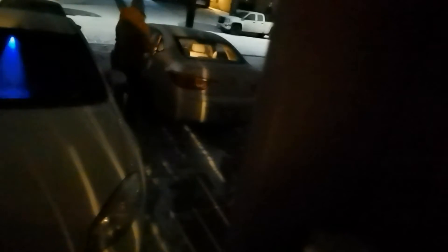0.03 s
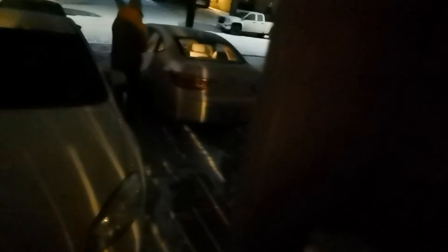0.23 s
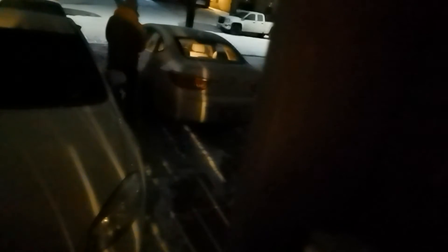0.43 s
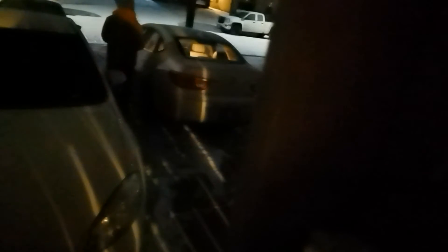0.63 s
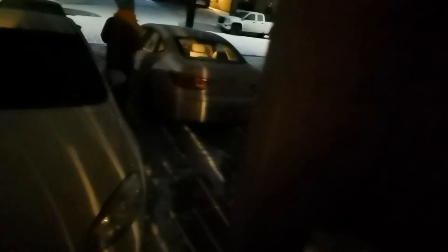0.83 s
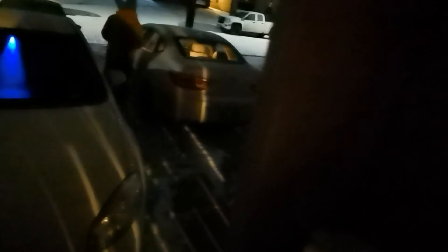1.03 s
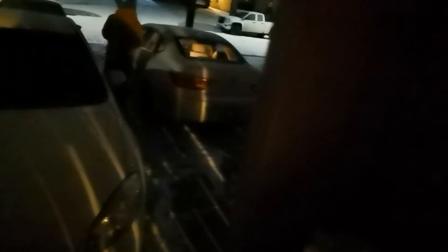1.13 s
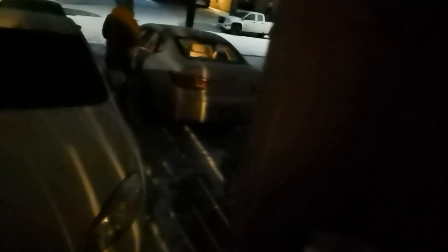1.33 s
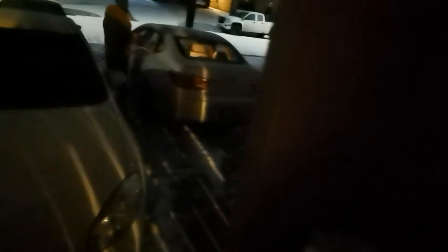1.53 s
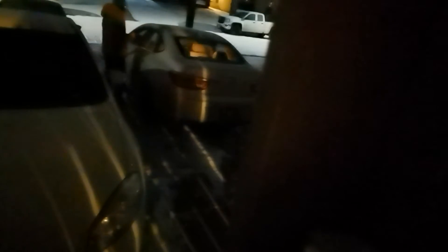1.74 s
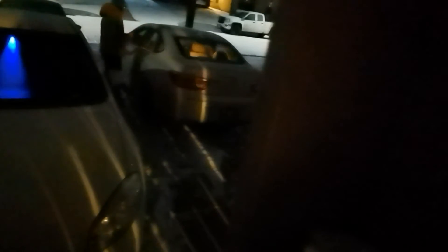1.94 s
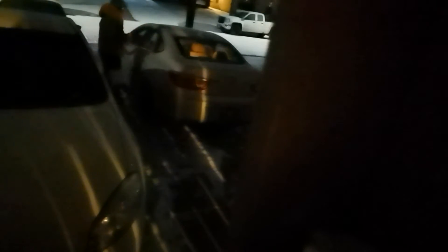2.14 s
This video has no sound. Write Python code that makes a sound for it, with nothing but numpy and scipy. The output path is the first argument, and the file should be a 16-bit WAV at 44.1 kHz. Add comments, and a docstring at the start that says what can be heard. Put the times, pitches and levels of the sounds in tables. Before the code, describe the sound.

Outdoors in a parking lot, one solid car door slam comes early, close to a stereo camera microphone; a quiet farther clunk follows at once, then faint knocks, soft clothing rustles and low traffic wash.

```python
"""Car door shut in a parking lot

A heavy car door shuts a few metres away: clacks of noise and ringing modes make the latch and its steel,
low sines thump the cabin air, and struck modes over a noisy rattle make the panels. A faint, dull second
clunk follows, as of a door farther off. Faint knocks and soft rustles, as of clothing, are bursts of
coloured noise. Distant traffic is a noise wash and a low rumble with a faint hum."""
import sys
import numpy as np
from scipy import signal
from scipy.fft import rfft, irfft, next_fast_len
from scipy.io import wavfile
from scipy.ndimage import uniform_filter1d, map_coordinates

SR = 44100
rng = np.random.default_rng(int(sys.argv[2]) if len(sys.argv) > 2 else 0)


def store_pcm(level_fs):
    """Save levels as 16-bit WAV."""
    pcm = np.round(np.clip(level_fs, -1, 1) * 32767).astype(np.int16)
    wavfile.write(sys.argv[1], SR, np.atleast_2d(pcm).T)


N = 97020  # length in samples


def amp(db):
    """Decibels to gain."""
    return 10 ** (np.asarray(db) / 20)


def unit(x):
    """Scale to rms 1."""
    return x / np.sqrt(np.mean(x ** 2) + 1e-20)


def along(points, hz):
    """Read (frequency, value) points on a log frequency axis."""
    f, v = np.transpose(points)
    return np.interp(np.log(hz + 1), np.log(f + 1), v)


def since(start_s):
    """Seconds since start_s, zero before it."""
    return np.maximum(np.arange(N) / SR - start_s, 0)


def octaves(hz, centre_hz):
    """Distance from a centre in octaves; the 20 Hz offset keeps the log finite."""
    return np.log2((hz + 20) / centre_hz)


def bump(hz, centre_hz, width_oct):
    """A broad resonance in dB, 0 near its centre and falling away on both sides."""
    return -20 * np.log10(1 + (octaves(hz, centre_hz) / width_oct) ** 2)


RIPPLE_DB, RIPPLE_SPACING_HZ = 3.5, 129.9  # unevenness like dense, short-lived resonances


def ripple(hz):
    """A smooth random curve over frequency, new at each call."""
    return map_coordinates(rng.standard_normal(1024), [hz / RIPPLE_SPACING_HZ], mode="wrap")


def wobble(rate):
    """A smooth random curve over time, rate knots a second."""
    knots = rng.standard_normal(int(N * rate / SR) + 4)
    return map_coordinates(knots, [np.arange(N) * rate / SR])


def filtered(x, response):
    """Filter x by a gain given over frequency."""
    m = next_fast_len(N + SR // 2)
    gain = response(np.fft.rfftfreq(m, 1 / SR))
    return irfft(rfft(x, m) * gain, m)[..., :N]


def half_angle(alike, hz):
    """Angle that splits mid from side so that left and right have the given coherence."""
    return np.arccos(np.clip(along(alike, hz), -1, 1)) / 2


def noise(colour, alike):
    """Stereo noise of rms 1; colour gives relative dB at each frequency."""
    def mid_side_gain(hz):
        angle = half_angle(alike, hz)
        return amp(colour(hz)) * [np.cos(angle), np.sin(angle)]

    mid, side = filtered(rng.standard_normal((2, N)), mid_side_gain)
    return unit(np.array([mid + side, mid - side]))


def patchy(x, depth_db):
    """Narrow bands of x swell and fade by chance; the result has rms 1."""
    z = signal.stft(x, nperseg=1024)[2]
    field = rng.standard_normal(z.shape[1:])
    field = uniform_filter1d(field, size=3, axis=0)  # smooth over frequency
    field = uniform_filter1d(field, size=9, axis=1)  # smooth over time
    return unit(signal.istft(z * amp(depth_db * unit(field)), nperseg=1024)[1][:, :N])


def strike(start_s, attack_s, t60_s):
    """Envelope of a blow: a quick rise, then a fall of 60 dB in each t60_s."""
    t = since(start_s)
    return (1 - np.exp(-t / attack_s)) * amp(-60 * t / t60_s)


MODE_SCATTER_DB = 1.5  # chance spread of mode levels from blow to blow
# left-right likeness of the struck sounds at the microphone: pitch_hz, coherence
STRUCK_ALIKE = [(100, .99), (300, .97), (600, .72), (1400, .74), (3100, .68), (6800, 0), (15000, .1)]


def ring(modes, start_s, attack_s):
    """Struck modes decay as sines, each with a chance phase that differs a little from left to right."""
    out = np.zeros((2, N + SR))
    t = np.arange(SR * 3 // 4) / SR
    chances = rng.standard_normal((len(modes), 2))
    for (pitch_hz, level_db, t60_s), (phase, size) in zip(modes, chances):
        apart = half_angle(STRUCK_ALIKE, pitch_hz) * np.sign(phase) * np.array([[1], [-1]])
        fall = amp(level_db + MODE_SCATTER_DB * size - 60 * t / t60_s)
        tone = np.sin(2 * np.pi * (pitch_hz * t + phase) + apart)
        out[:, round(start_s * SR):][:, :len(t)] += fall * tone
    return out[:, :N] * (1 - np.exp(-since(start_s) / attack_s))


# left-right likeness of the open air at the microphone: pitch_hz, coherence
AIR_ALIKE = [(60, .97), (290, .96), (640, .7), (1400, .35), (3100, .35), (6800, 0), (15000, 0)]
# colour of the distant traffic wash: pitch_hz, relative level_db per Hz
TRAFFIC_COLOUR = [(15, -30), (40, -20.5), (80, -5), (113, -5.5), (165, -2.5), (210, -9.5), (290, -9.5),
                  (450, -17.5), (614, -19.5), (826, -31), (1300, -34), (2300, -45.5), (3200, -50),
                  (8000, -52), (15500, -56.5)]
# level of the low rumble: time_s, level_db
RUMBLE_LEVEL = [(0, -43.5), (0.601, -44.5), (.78, -48), (0.901, -41.5), (1.05, -45.5), (1.2, -49.5),
                (1.281, -54), (1.499, -51), (1.75, -53.5), (1.999, -49), (2.2, -57)]
# colour of the low rumble: pitch_hz, relative level_db per Hz
RUMBLE_COLOUR = [(15, -18), (28, -3.5), (48, 3.5), (75, -5), (110, -17.5), (220, -38.5), (600, -90)]
# faint hum under the traffic: pitch_hz, level_db
HUM = [(172, -58), (1835, -82)]
TRAFFIC_DB, SWAY_DB, WASH_PATCHY_DB, HUM_WAVER_DB = -49.5, 0.5, 2.5, 3.5


def traffic():
    """Distant traffic blurs into a swaying wash of noise, a low rumble that swells, and a wavering hum."""
    sway = amp(TRAFFIC_DB + SWAY_DB * wobble(6.19))
    wash = sway * patchy(noise(lambda hz: along(TRAFFIC_COLOUR, hz), AIR_ALIKE), WASH_PATCHY_DB)
    rumble_gain = amp(np.interp(since(0), *np.transpose(RUMBLE_LEVEL)))
    rumble = rumble_gain * noise(lambda hz: along(RUMBLE_COLOUR, hz), AIR_ALIKE)
    hum = 0
    for pitch_hz, level_db in HUM:
        waver = amp(level_db + HUM_WAVER_DB * wobble(17))
        hum = hum + waver * np.sin(2 * np.pi * pitch_hz * since(0) + wobble(25))  # the phase drifts too
    return wash + rumble + hum


# faint knocks and ticks: start_s, level_db, pitch_hz, t60_s
KNOCKS = [(0.016, -62, 2650, 0.035), (.641, -64, 1190, 0.046), (0.889, -62, 2260, 0.075),
          (0.972, -62, 1700, 0.046), (1.011, -64.5, 1300, .06), (1.055, -68, 1110, 0.07),
          (1.125, -57.5, 870, 0.095), (1.242, -58.5, 1610, 0.034), (1.2493, -51, 1020, .05),
          (1.61, -61, 1530, 0.17), (1.771, -65.5, 1190, 0.024), (1.853, -70, 1300, .04),
          (2.017, -71, 1800, 0.027)]
KNOCK_WIDTH_OCT, KNOCK_ATTACK_S = 0.29, 0.00098


def knocks():
    """Small dead knocks: noise bursts, each in one broad, uneven resonance."""
    out = np.zeros((2, N))
    for start_s, level_db, pitch_hz, t60_s in KNOCKS:
        knock = noise(lambda hz: bump(hz, pitch_hz, KNOCK_WIDTH_OCT) + RIPPLE_DB * ripple(hz), STRUCK_ALIKE)
        out += amp(level_db) * strike(start_s, KNOCK_ATTACK_S, t60_s) * knock
    return out


# decay of the parking lot's diffuse tail: pitch_hz, t60_s
LOT_DECAY = [(100, 0.58), (400, .3), (1500, .45), (4000, 0.38), (12000, 0.28)]
LOT_DB = -13.5


def lot(x):
    """Diffuse scatter from the ground and the parked cars: a decaying noise tail, nearly mono in the bass."""
    hz, t, z = signal.stft(rng.standard_normal((2, SR * 3 // 4)), SR, nperseg=256)
    fall = amp(-60 * t / along(LOT_DECAY, hz)[:, None])
    tail = signal.istft(z * fall, SR, nperseg=256)[1]
    wet = signal.fftconvolve(x, tail / np.linalg.norm(tail[0]), axes=1)[:, :N]
    # blend each side towards the other where the air is alike
    blend = filtered(wet[::-1] - wet, lambda hz: np.clip(along(AIR_ALIKE, hz), 0, 1) / 2)
    return amp(LOT_DB) * (wet + blend)


# latch and frame contacts, a few metres away: start_s, level_db, tilt_db per octave, t60_s, pitch_hz
CONTACTS = [(0.1552, -45.5, -1, .05, 2700), (.1685, -50, 0, 0.16, 3500), (.1828, -20, -0.5, 0.042, 3450),
            (.1965, -28, 2, .07, 470), (0.2022, -23.5, 1, .09, 4050), (0.2211, -19, -.5, .03, 1120),
            (0.2294, -32, -2.5, .11, 1500), (0.256, -30.5, 0, .04, 1200), (.294, -47, 0, 0.09, 2600)]
# colour shared by the contacts: pitch_hz, relative level_db per Hz
CLACK_COLOUR = [(120, -25), (300, 5.5), (470, 9), (700, -5), (870, -14), (1100, -1.5), (1600, -1.5),
                (2000, -11), (2500, -5), (3200, -7), (4100, -11.5), (4600, -12.5), (5700, -20), (6400, -16),
                (7400, -15.5), (9500, -28), (12000, -28), (15500, -36.5)]
# ringing steel of the latch and frame: pitch_hz, level_db, t60_s
STEEL = [(954, -3.5, .15), (1091, 1.5, 0.14), (1253, -3, 0.22), (1380, -6, 0.12), (1541, -3.5, .14),
         (1630, -2, .12), (2390, -8.5, .07), (2956, -8, .07), (3534, -3.5, .1), (3890, -6, .07),
         (4210, -9.5, 0.13), (6320, -11.5, .07), (7240, -13, 0.11)]
STEEL_DB, CONTACT_ATTACK_S = -18, 0.00077
CONTACT_PEAK_DB, CONTACT_PEAK_OCT = 8.5, .1  # height and width of each contact's main resonance
CRUNCH_DB, CRUNCH_PER_S = 2.5, 700  # fast uneven level


def latch():
    """Each contact is a short, crunchy clack with its own resonances, and rings the steel."""
    out = np.zeros((2, N))
    for start_s, level_db, tilt_db, t60_s, pitch_hz in CONTACTS:
        def colour(hz):
            tilted = along(CLACK_COLOUR, hz) + tilt_db * octaves(hz, 2000)
            peak = CONTACT_PEAK_DB * amp(bump(hz, pitch_hz, CONTACT_PEAK_OCT))
            return tilted + RIPPLE_DB * ripple(hz) + peak

        clack = noise(colour, STRUCK_ALIKE) * unit(amp(CRUNCH_DB * wobble(CRUNCH_PER_S)))
        clack = clack * strike(start_s, CONTACT_ATTACK_S, t60_s)
        steel = amp(STEEL_DB) * ring(STEEL, start_s, CONTACT_ATTACK_S)
        out += amp(level_db) * (clack + steel)
    return out


# door skin and body panels: pitch_hz, level_db, t60_s
PANELS = [(163.7, 0.5, 0.39), (221.6, -2.5, 0.49), (243.7, -2.5, 0.43), (292, 2.5, .32), (318, -6, 0.2),
          (374, -8.5, 0.21), (430.5, -5, 0.19), (477.6, -1.5, 0.26), (514.2, -2, 0.2), (584, -5, .2),
          (670, -15.5, 0.18), (782, -10, .13)]
# blows that shake the panels: start_s, level_db
SHAKES = [(0.1852, -36), (0.1963, -29), (0.2214, -28), (0.2304, -33.5)]
PANEL_ATTACK_S = 0.0028
# dense rattle of the trim and the door's insides
RATTLE_S, RATTLE_DB, RATTLE_HZ, RATTLE_WIDTH_OCT = .186, -21.5, 330, 1
RATTLE_ATTACK_S, RATTLE_T60_S = 0.018, 0.33


def panels():
    """The sheet metal rings after each blow while the trim rattles as one burst of noise."""
    rattle = noise(lambda hz: bump(hz, RATTLE_HZ, RATTLE_WIDTH_OCT) * 2, STRUCK_ALIKE)
    rattle = rattle * strike(RATTLE_S, RATTLE_ATTACK_S, RATTLE_T60_S)
    shaken = sum(amp(level_db) * ring(PANELS, start_s, PANEL_ATTACK_S) for start_s, level_db in SHAKES)
    return amp(RATTLE_DB) * rattle + shaken


# low modes of the air in the car: pitch_hz, level_db, t60_s
CABIN = [(29, -12, 0.42), (43.5, -8.5, 0.2), (56.4, -6, .4), (66.4, -23.5, 0.38), (73.2, -10, 0.54),
         (97.5, -15, .35)]
SEAL_S, SEAL_ATTACK_S = .2006, 0.0064
PUSH_HZ, PUSH_DB, PUSH_S = 60, -11, .024
CABIN_PAN_DB = -.3  # left gain; the right has the opposite


def cabin():
    """One push of air as the seal closes, then the beating low modes of the car."""
    t = since(SEAL_S)
    swell = np.sin(np.pi * np.minimum(t / PUSH_S, 1))
    boom = amp(PUSH_DB) * np.sin(2 * np.pi * PUSH_HZ * t) * swell
    for pitch_hz, level_db, t60_s in CABIN:
        boom += amp(level_db) * np.sin(2 * np.pi * pitch_hz * t) * strike(SEAL_S, SEAL_ATTACK_S, t60_s)
    return boom * amp([[CABIN_PAN_DB], [-CABIN_PAN_DB]])


# soft rustles and scuffs: centre_s, spread_s (bell curve), level_db, pitch_hz, width_oct
RUSTLES = [(0.324, 0.01, -55.5, 7500, 0.75), (0.329, .018, -63, 6000, 2.2), (0.869, 0.039, -69, 3950, 1.8),
           (1.02, 0.096, -75, 2570, 1.05), (1.276, .014, -69.5, 9000, 2.5), (1.44, .02, -76, 8040, 1.7),
           (1.52, .026, -72.5, 4400, 0.11), (1.59, 0.072, -77, 4200, 0.063), (1.525, .07, -76.5, 5500, 1.1),
           (1.88, 0.037, -76, 5930, 1.1), (1.993, 0.13, -79.5, 8050, 2), (2.192, 0.024, -63.5, 14100, 1.4)]
# colour of the rubbing: pitch_hz, relative level_db per Hz
CLOTH_COLOUR = [(500, -15), (2000, 10.5), (4400, 3), (7000, 3), (9000, -10.5), (12500, 5), (15500, 1.5)]
RUSTLE_GRAIN_DB = 2


def rustle():
    """Grainy swells of soft rubbing, made of banded noise; the narrow ones almost squeak."""
    swells = np.zeros((2, N))
    for centre_s, spread_s, level_db, pitch_hz, width_oct in RUSTLES:
        def colour(hz):
            return along(CLOTH_COLOUR, hz) + bump(hz, pitch_hz, width_oct) + RIPPLE_DB * ripple(hz)

        swell = np.exp(-.5 * ((since(0) - centre_s) / spread_s) ** 2)
        swells += amp(level_db) * swell * noise(colour, AIR_ALIKE)
    return swells * unit(amp(RUSTLE_GRAIN_DB * wobble(150)))


# contacts of the clunk farther off: start_s, level_db, attack_s, t60_s
FAR_CONTACTS = [(0.369, -51, 0.0097, 0.31), (0.39, -48.5, 0.0014, .12), (0.408, -46, 0.0011, 0.26)]
# colour of the far clunk: pitch_hz, relative level_db per Hz
FAR_COLOUR = [(40, -6), (115, 24), (200, 12), (500, 2.5), (900, -5.5), (1350, 0), (1900, -7), (2450, -7.5),
              (4100, -11), (5200, -30), (15000, -43)]
# ring of the far clunk: pitch_hz, level_db, t60_s
FAR_RING = [(110.7, 15, 0.2), (1307, -1, 0.066), (1360, -1.5, 0.099), (2430, -10, 0.091)]


def far_door():
    """A dull, quiet clunk: bursts of bass-heavy noise with a short ring."""
    out = np.zeros((2, N))
    for start_s, level_db, attack_s, t60_s in FAR_CONTACTS:
        clunk = noise(lambda hz: along(FAR_COLOUR, hz) + RIPPLE_DB * ripple(hz), STRUCK_ALIKE)
        clunk = clunk * strike(start_s, attack_s, t60_s)
        out += amp(level_db) * (clunk + ring(FAR_RING, start_s, attack_s))
    return out


def scene():
    """The doors and the small sounds in the open lot; only the struck sounds scatter."""
    struck = knocks() + latch() + panels() + far_door()
    return traffic() + struck + lot(struck) + cabin() + rustle()


TOP_HZ = 15800


def record(dry):
    """The camera's microphone keeps almost nothing above its steep band limit."""
    return filtered(dry, lambda hz: 1 / np.sqrt(1 + (hz / TOP_HZ) ** 160))


dry = scene()
out = record(dry)
store_pcm(out)
```